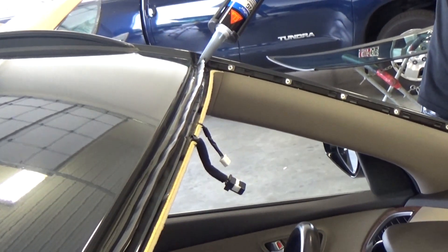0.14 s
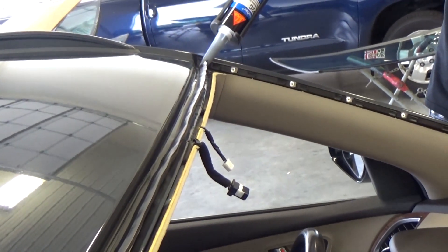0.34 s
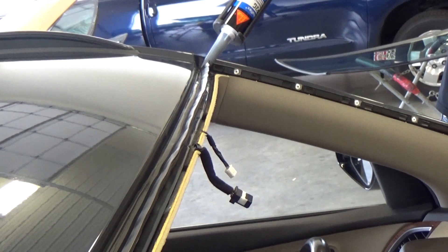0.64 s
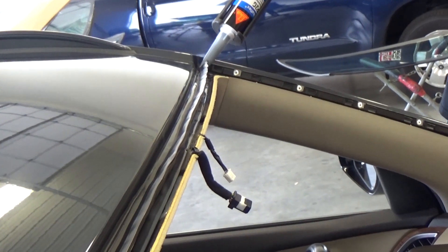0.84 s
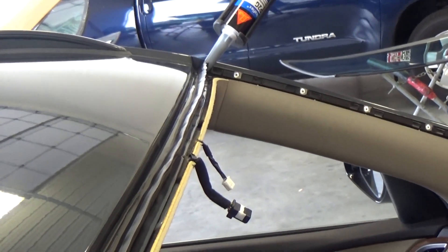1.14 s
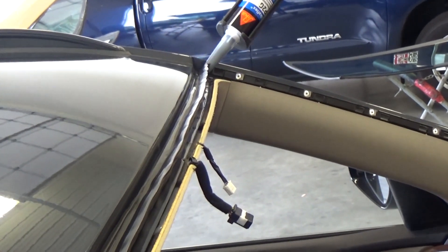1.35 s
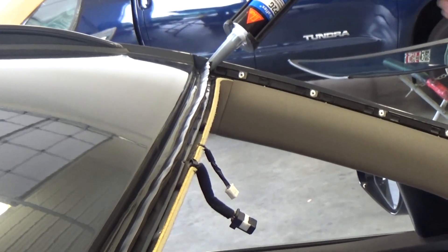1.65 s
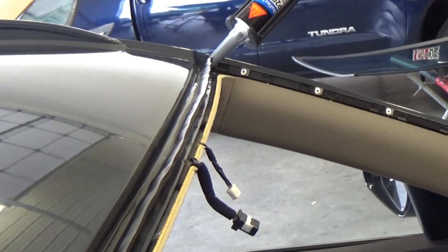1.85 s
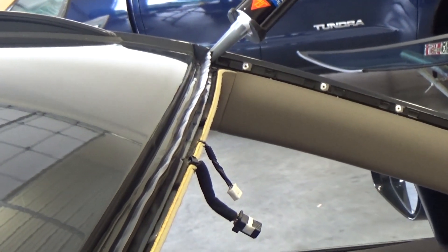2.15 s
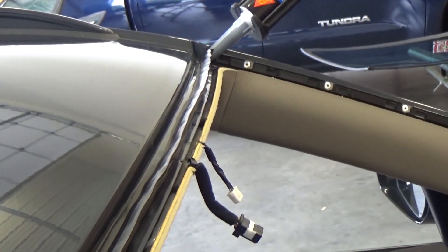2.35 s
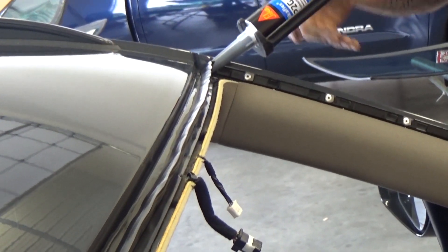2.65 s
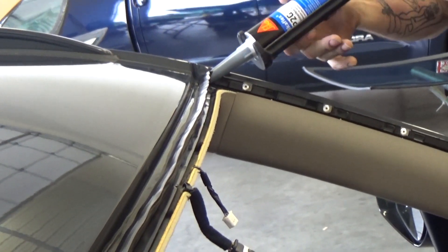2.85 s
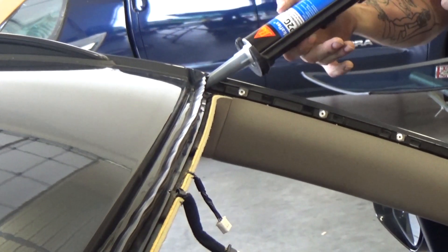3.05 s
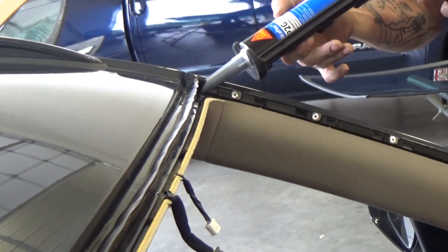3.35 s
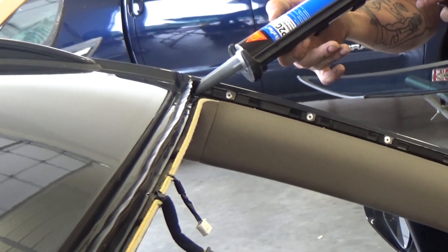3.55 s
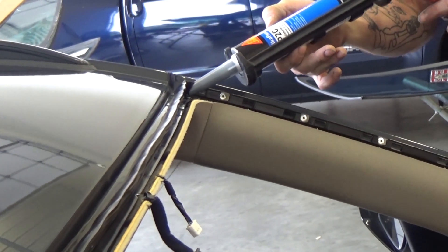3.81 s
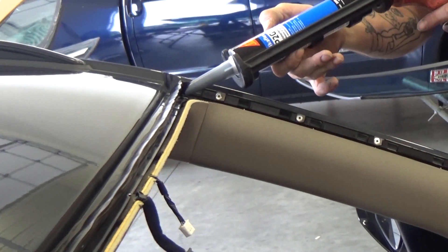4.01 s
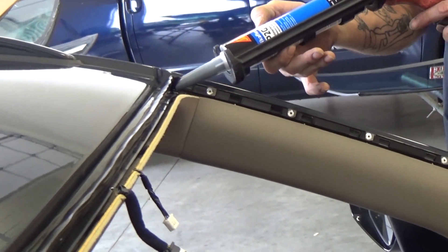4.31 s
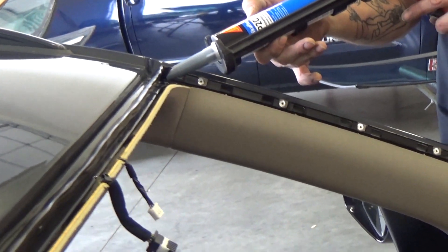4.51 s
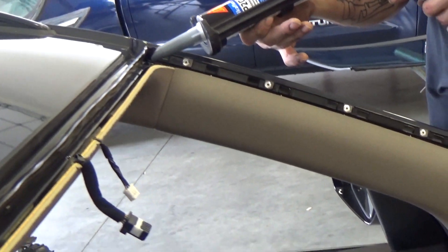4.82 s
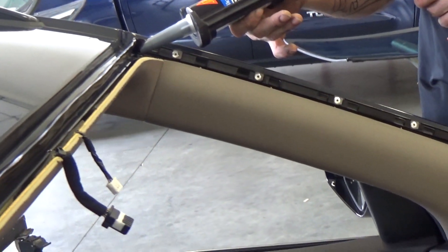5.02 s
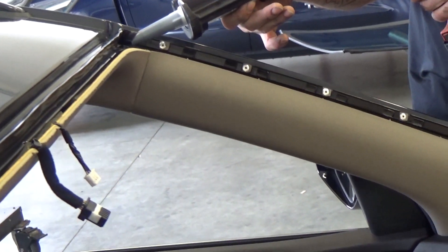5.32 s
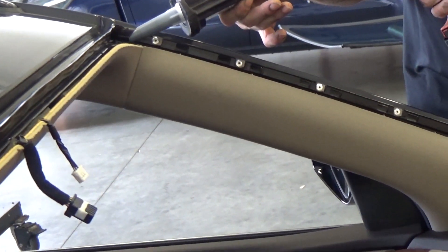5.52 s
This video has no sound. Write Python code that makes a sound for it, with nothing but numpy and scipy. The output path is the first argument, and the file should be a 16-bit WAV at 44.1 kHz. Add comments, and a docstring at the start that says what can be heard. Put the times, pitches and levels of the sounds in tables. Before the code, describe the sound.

In an echoing workshop, an air motor whines and winds down, a sealant gun spits short air blasts, then hisses loudly and steadily.

```python
"""A pneumatic sealant gun in a large, echoing workshop: noise-made fans drone throughout.
At first an air motor whines (rotor harmonics) and blows (port-coloured noise), then runs down.
The gun spits short blasts of shaped noise with a ringing vent and falls quiet; soft puffs follow.
Among them a far thud, a burst of dull noise, rolls through the hall; then the gun hisses on.
Gain control ducks everything under a loud blast and slowly lets it swell again."""
import sys
import numpy as np
from scipy import signal
from scipy.fft import rfft, irfft, next_fast_len
from scipy.io import wavfile
from scipy.ndimage import uniform_filter1d

SR = 44100
rng = np.random.default_rng(int(sys.argv[2]) if len(sys.argv) > 2 else 0)


def persist_wave(psi):
    """Save psi, clipped to +-1, as 16-bit WAV."""
    counts = np.round(np.clip(psi, -1, 1) * 32767).astype(np.int16)
    wavfile.write(sys.argv[1], SR, np.atleast_2d(counts).T)


N = 250047

# Colour of the fans' drone: frequency_hz, relative_density_db
FAN_COLOUR = [(25, -24), (70, -10.5), (105, -4), (150, -3), (270, 0), (400, -2), (600, -6.5), (1000, -8),
              (1400, -14.5), (2200, -20), (3300, -24.5), (5000, -29), (7500, -30.5), (10000, -30),
              (16000, -38.5)]
# Colour of the motor's exhaust: frequency_hz, relative_density_db
EXHAUST_COLOUR = [(100, -17), (280, 3), (550, -1), (900, 1.5), (1400, -5.5), (1900, 0.5), (3000, -3.5),
                  (4200, -0.5), (7500, -4), (11000, -2), (12500, -4.5), (14500, -14.5), (16000, -15)]
# Resonances of the motor's exhaust port: frequency_hz, width_hz, gain_db
EXHAUST_PORT = [(2000, 310, 3), (2247, 115, 10), (3670, 100, 7.5), (5450, 190, 4), (8600, 550, 6),
                (9500, 340, -3), (9940, 260, 7), (10700, 560, 5)]
# How strongly the motor's housing passes a harmonic: frequency_hz, gain_db
MOTOR_HOUSING = [(1400, -15), (1830, -4.5), (2300, -14), (2745, -1.5), (3200, 11), (3660, -4), (4100, 6),
                 (4500, -26)]
# Stereo lean of drone and exhaust, mostly to the right: frequency_hz, left_re_right_db
LEAN = [(120, -0.5), (400, -1.7), (1200, 0.1), (6000, -0.47)]
# Colour of the gun's jet: frequency_hz, relative_density_db
JET_COLOUR = [(100, -24.5), (300, -19), (600, -16.5), (1100, -12.5), (2200, -9.5), (3600, -4.5),
              (5000, -1.5), (8300, -1.5), (10000, -1.5), (13000, -2.5), (14500, -6.5), (16000, -10)]
# Faint resonances of the gun's barrel: frequency_hz, width_hz, gain_db
BARREL = [(2210, 250, 3), (2750, 370, 0.5), (3800, 550, 1.5), (4400, 300, -0.5), (9900, 540, 0.5)]
# The vent's hollow ring: frequency_hz, width_hz, relative_level_db
VENT = [(5720, 1070, 2), (6550, 490, -1.5)]
# Openings of the gun's valve, the last being the long hiss: start_s, length_s, attack_s, flow_db,
# rasp_db_per_octave below the ring, top_sizzle_db, vent_ring_db (the last two relative to flow)
BLASTS = [(1.148, 0.029, .005, -19.5, 6.5, -7.5, -1), (1.199, 0.041, 0.0044, -13, -1, 5.5, -10),
          (1.24, 0.076, .01, -23, -2, 7, -5.5), (1.305, 0.179, 0.025, -7, 0, 2.5, -6),
          (2.356, 0.24, 0.072, -31, 3.5, 0.5, -2), (3, 0.25, 0.19, -29.5, 8, -0.5, -4),
          (3.246, 2.53, 0.0032, 4.5, 0.35, 4, -3)]
# The long hiss changes colour as the gun is turned; swings are taken about the means:
# time_s, level_db around the vent's ring, treble_db and low_rasp_db relative to that level
TURNING = [(3.27, -19.5, 1, -9), (3.52, -16, -0.5, -11), (3.68, -22.5, 5, -15.5), (3.9, -21.0, 4, -12),
           (4.13, -25, 9, -13.5), (4.3, -23.0, 4, -7), (4.56, -19, -1.0, -15), (5.03, -18.5, -3, -13.5),
           (5.35, -21, 2.5, -8.5), (5.55, -22.5, 1.5, -7.5), (5.66, -17, 0, -5)]
# Colour of the far thud: frequency_hz, relative_density_db
THUD_COLOUR = [(60, -9), (160, -7.5), (300, 4.5), (450, 0.5), (780, 0.5), (1080, 1.5), (1350, -6),
               (1700, -6.5), (2300, -11), (3300, -20.5), (5000, -19), (9000, -33), (16000, -40)]
# Side level used for the gun's noise, nearly mono in some bands: frequency_hz, side_re_mid_db
GUN_SIDE_LEVEL = [(60, -19), (450, -24), (1200, -61), (3300, -68), (4800, -52), (6200, -17), (9000, -14.5),
                  (10800, -17), (12000, -44), (15000, -58)]
# Side level used for fans, exhaust and thud, nearly mono in some bands: frequency_hz, side_re_mid_db
BACKGROUND_SIDE_LEVEL = [(60, -24), (200, -25.5), (700, -22), (1300, -28), (2400, -63), (4400, -50),
                         (7000, -48), (9000, -10.5), (11500, -50), (15000, -45)]
# The hall's reverberation: frequency_hz, t60_s
HALL = [(250, 0.7), (1000, 1.7), (2200, 1.6), (3800, 1.6), (5600, 1.15), (8000, 0.97), (11000, 0.64),
        (15000, 0.31)]
# Microphone port resonance: frequency_hz, width_hz, gain_db
MICROPHONE = [(5890, 1070, 4.5)]

CUTOFF_HZ = 15850
TIME = np.arange(N) / SR  # seconds
SIZE = next_fast_len(N)
BIN_HZ = np.maximum(np.arange(SIZE // 2 + 1) * SR / SIZE, 1)

FANS_DB = -23
# the air motor runs until its air is cut, then coasts down (time constant)
MOTOR_CUT_S, MOTOR_COAST_S = 1.039, 0.22
ROTOR_START_HZ, ROTOR_SAG_HZ_PER_S = 922, 13
WHINE_START_DB, WHINE_SWELL_DB_PER_S, WHINE_FADE_DB_PER_S = -34, 7.5, 400
# its exhaust blows a little longer, until the line is empty
EXHAUST_DB, EXHAUST_LAG_S, EXHAUST_FADE_DB_PER_S = -20.5, 0.068, 172
VALVE_CLOSING_DB_PER_S = 255
# share of the turning swings taken by jet, treble, rasp (per octave) and ring (on top of the jet's)
FLOW_FOLLOWS, SIZZLE_FOLLOWS, RASP_FOLLOWS, RING_FOLLOWS = 1, 1, 0.64, 0.7
# the far thud: one swell and fall
THUD_START_S, THUD_LENGTH_S, THUD_ATTACK_S = 2.92, 0.083, 0.045
THUD_FADE_DB_PER_S, THUD_DB = 452, -12.5


def from_db(db):
    """Decibels to gain."""
    return 10 ** (np.asarray(db) / 20)


def in_time(rows):
    """Each column of a curve, at every sample."""
    seconds, *columns = np.transpose(rows)
    return [np.interp(TIME, seconds, column) for column in columns]


def over_hz(points):
    """A table joined by straight lines in log frequency."""
    hz, value = np.transpose(points)
    return np.interp(np.log(BIN_HZ), np.log(hz), value)


def peaks(resonances):
    """Gain in dB of a few resonances."""
    return sum(db / (1 + (2 * (BIN_HZ - hz) / width) ** 2) for hz, width, db in resonances)


def lag(x, seconds):
    """One-pole smoothing."""
    pole = np.exp(-1 / (seconds * SR))
    return signal.lfilter([1 - pole], [1, -pole], x)


def drift(rate_hz):
    """Slow random wander with spread 1, weakening above its rate."""
    count = N // 50
    hz = np.arange(count // 2 + 1) * SR / N
    spectrum = rfft(rng.standard_normal(count)) * (hz > 0) / (1 + (hz / rate_hz) ** 2)
    slow = irfft(spectrum, count)
    return np.interp(TIME, np.linspace(0, N / SR, count), slow / slow.std())


def turbulence(colour_db, side_level, lean_db=0):
    """Spectrum of nearly centred stereo noise of this colour; rms about 1 before side and lean."""
    mid, side = rfft(rng.standard_normal((2, SIZE)))
    gain = from_db(colour_db) * (BIN_HZ < CUTOFF_HZ)
    left_right = np.array([[1], [-1]])
    leaning_mid = mid * from_db(left_right * lean_db / 2)
    pair = leaning_mid + left_right * side * from_db(over_hz(side_level))
    return pair * gain / np.sqrt(np.mean(gain ** 2))


def played(spectrum):
    """From a spectrum back to sound."""
    return irfft(spectrum, SIZE)[:, :N]


def fading(end_s, db_per_s):
    """Gain that holds until a moment, then falls evenly in dB."""
    return from_db(-np.minimum(db_per_s * np.maximum(TIME - end_s, 0), 200))


def envelope(start_s, length_s, attack_s, fade_db_per_s):
    """Attack, hold and release; the length counts from the start of the attack."""
    attack = np.clip((TIME - start_s) / attack_s, 0, 1)
    return attack * fading(start_s + length_s, fade_db_per_s)


def lingering(level, t60, echo_share):
    """The hall stores part of a sound's energy and gives it back as a decay."""
    share = np.clip(echo_share, 0, 1)
    echo_power = lag(level ** 2, t60 / np.log(1e6))
    return np.sqrt((1 - share) * level ** 2 + share * echo_power)


def in_hall(noise, level_db_at, echo_share, flutter_db):
    """Fluttering noise split into overlapping bands, each dying away at the hall's own rate there."""
    out, flutter = 0, drift(23)
    for k, (hz, t60) in enumerate(HALL):
        band = over_hz([(row[0], j == k) for j, row in enumerate(HALL)])
        # part of the flutter is common to all bands, part is the band's own
        level = from_db(level_db_at(hz) + flutter_db * (flutter + drift(35)))
        out = out + played(noise * band) * lingering(level, t60, echo_share)
    return out


def fans():
    """The steady drone of the workshop: low-heavy noise."""
    drone = turbulence(over_hz(FAN_COLOUR), BACKGROUND_SIDE_LEVEL, over_hz(LEAN))
    return from_db(FANS_DB) * played(drone)


def motor_exhaust():
    """Air rushing out through a ringing port until the line is empty."""
    fade = fading(MOTOR_CUT_S + EXHAUST_LAG_S, EXHAUST_FADE_DB_PER_S)
    blowing = from_db(EXHAUST_DB + 1.55 * drift(40)) * fade
    colour_db = over_hz(EXHAUST_COLOUR) + peaks(EXHAUST_PORT)
    rush = played(turbulence(colour_db, BACKGROUND_SIDE_LEVEL, over_hz(LEAN)))
    return rush * lingering(blowing, t60=0.93, echo_share=0.17)


def motor_whine():
    """Rotor harmonics, coloured by the housing, that slide down as the motor stops."""
    coasting = np.exp(-np.maximum(TIME - MOTOR_CUT_S, 0) / MOTOR_COAST_S)
    rotor_hz = (ROTOR_START_HZ - ROTOR_SAG_HZ_PER_S * TIME) * coasting
    phase = 2 * np.pi * np.cumsum(rotor_hz * (1 + 0.00494 * drift(34.6))) / SR
    whine, scatter = 0, 0.48
    for k in range(2, 6):
        # reflections make each line swell and fade on its own
        line = (0.97 + scatter * drift(22)) * np.sin(k * phase)
        line = line + scatter * drift(10) * np.cos(k * phase)
        housing_db = np.interp(k * rotor_hz, *np.transpose(MOTOR_HOUSING))
        whine = whine + from_db(housing_db) * line
    swell = from_db(WHINE_START_DB + WHINE_SWELL_DB_PER_S * TIME)
    return whine * swell * fading(MOTOR_CUT_S, WHINE_FADE_DB_PER_S)


def air_motor():
    """The motor's blowing exhaust and its whining rotor together."""
    return motor_exhaust() + motor_whine()


def turning():
    """Swings of level, treble and rasp about their means, during the long hiss."""
    hissing = TIME >= BLASTS[-1][0]
    return [(db - db[hissing].mean()) * hissing for db in in_time(TURNING)]


def gun():
    """Blasts of the air jet and its ringing vent; rasp, sizzle and ring shift as the gun is turned."""
    # valve openings as power, so that overlapping blasts add in energy
    openings = np.array([envelope(*row[:3], VALVE_CLOSING_DB_PER_S) for row in BLASTS]) ** 2
    flow_db, rasp_db, sizzle_db, ring_db = np.transpose(BLASTS)[3:]
    swing_db, treble_swing_db, rasp_swing_db = turning()

    def all_blasts_db(each_db):
        power = from_db(each_db) ** 2 @ openings
        return 10 * np.log10(power + 1e-18) + FLOW_FOLLOWS * swing_db

    def level_db_at(hz):
        octaves_below = np.clip(np.log2(5600 / hz), 0, 2)
        top = np.clip((hz - 7800) / 2500, 0, 1)
        turned_db = octaves_below * RASP_FOLLOWS * rasp_swing_db
        turned_db = turned_db + top * SIZZLE_FOLLOWS * treble_swing_db
        return all_blasts_db(flow_db + octaves_below * rasp_db + top * sizzle_db) + turned_db

    jet_noise = turbulence(over_hz(JET_COLOUR) + peaks(BARREL), GUN_SIDE_LEVEL)
    jet = in_hall(jet_noise, level_db_at, echo_share=0.81, flutter_db=1.6)
    vent = sum(from_db(db) / (1 + (2 * (BIN_HZ - hz) / width) ** 2) for hz, width, db in VENT)
    ringing_db = all_blasts_db(flow_db + ring_db) + RING_FOLLOWS * swing_db + 2.3 * drift(22)
    ring_level = lingering(from_db(ringing_db), t60=2.8, echo_share=0.35)
    ring = played(turbulence(20 * np.log10(vent), GUN_SIDE_LEVEL)) * ring_level
    return from_db(-1.0) * jet + from_db(-7.5) * ring


def thud():
    """A dull blow across the hall: a short noise burst, most of its energy given back as echo."""
    blow = envelope(THUD_START_S, THUD_LENGTH_S, THUD_ATTACK_S, THUD_FADE_DB_PER_S)
    level = lingering(from_db(THUD_DB) * blow, t60=1.4, echo_share=0.71)
    return played(turbulence(over_hz(THUD_COLOUR), BACKGROUND_SIDE_LEVEL)) * level


def scene():
    """Everything that sounds in the workshop."""
    return fans() + air_motor() + gun() + thud()


def gain_control(x, ceiling_db, release_db_per_s, attack_s, ahead_s):
    """Turns down just ahead of a loud sound and recovers slowly."""
    power = uniform_filter1d(np.mean(x ** 2, axis=0), int(0.02 * SR))
    over_db = np.maximum(10 * np.log10(np.abs(power) + 1e-12) - ceiling_db, 0)
    # hold each peak, letting it sink at the release rate
    release_db = release_db_per_s * TIME
    held_db = np.maximum.accumulate(over_db + release_db) - release_db
    return x * from_db(-np.interp(TIME + ahead_s, TIME, lag(held_db, attack_s)))


def record(dry):
    """Microphone colour, gain control and a steep top cut."""
    coloured = played(rfft(dry, SIZE) * from_db(peaks(MICROPHONE)))
    levelled = gain_control(coloured, ceiling_db=-16.0, release_db_per_s=6.0,
                            attack_s=0.0082, ahead_s=0.013)
    return played(rfft(levelled, SIZE) / np.sqrt(1 + (BIN_HZ / CUTOFF_HZ) ** 200))


dry = scene()
out = record(dry)
persist_wave(out)
```